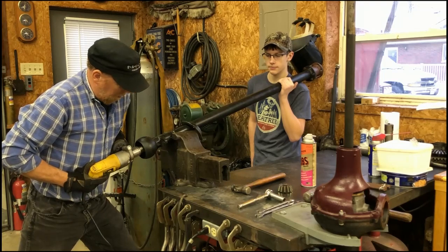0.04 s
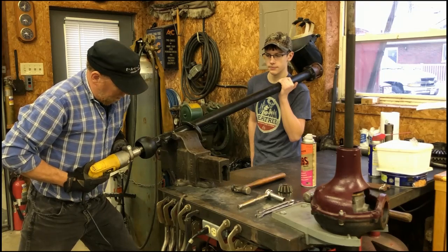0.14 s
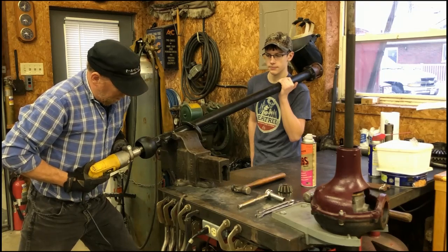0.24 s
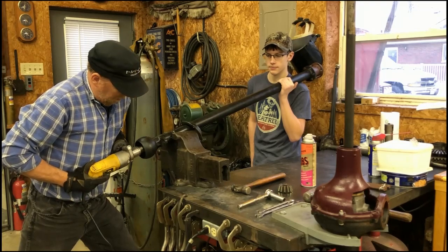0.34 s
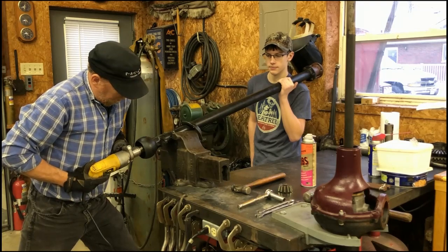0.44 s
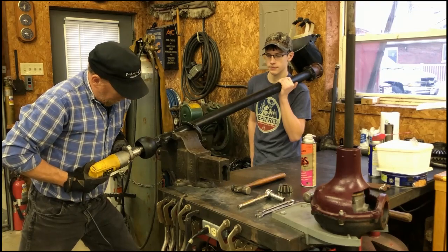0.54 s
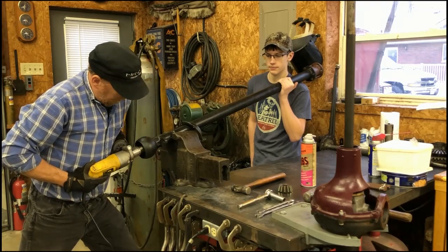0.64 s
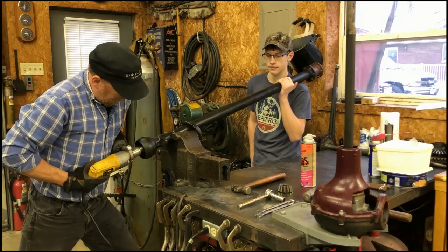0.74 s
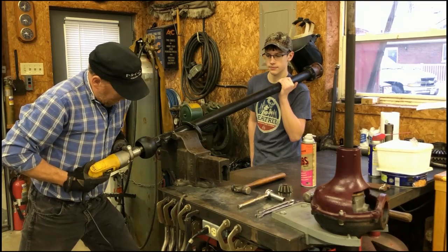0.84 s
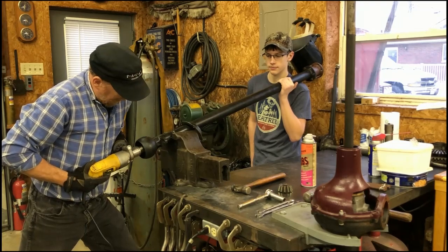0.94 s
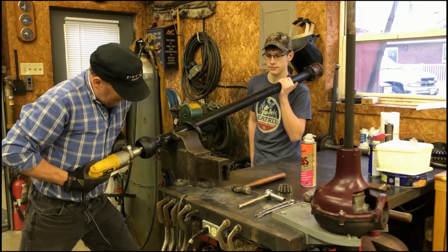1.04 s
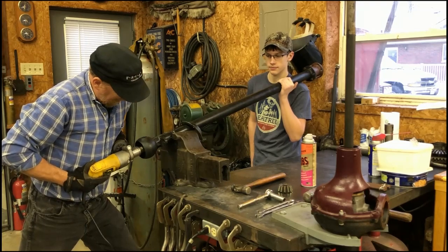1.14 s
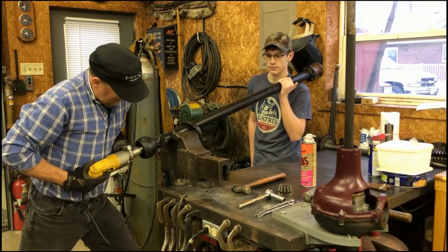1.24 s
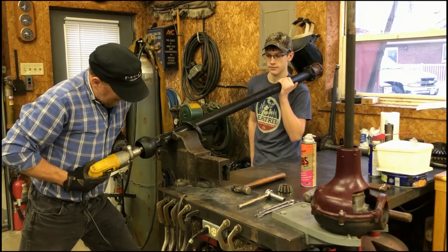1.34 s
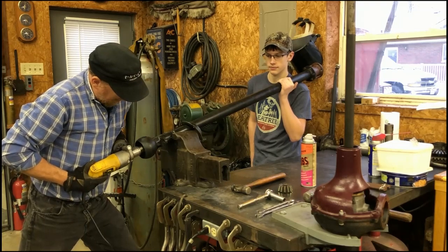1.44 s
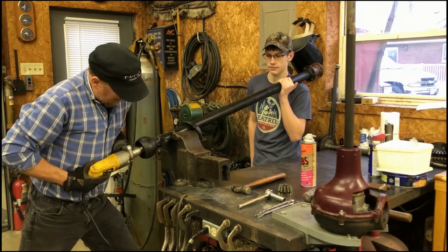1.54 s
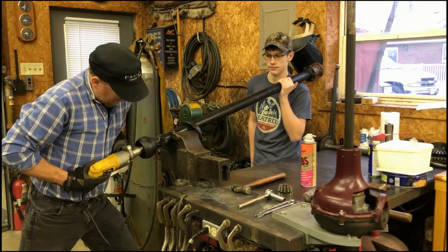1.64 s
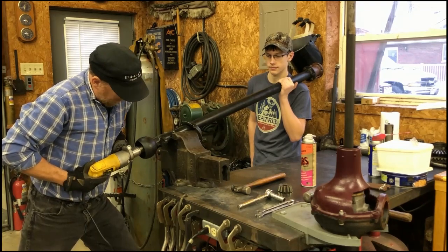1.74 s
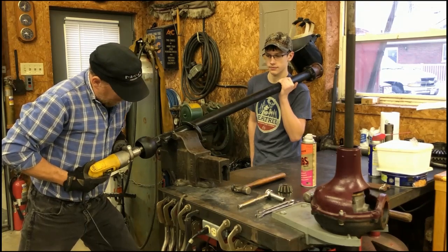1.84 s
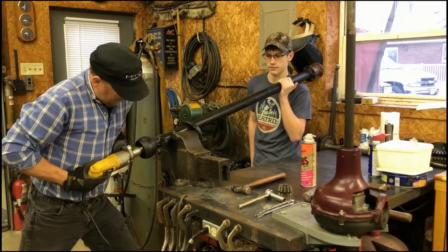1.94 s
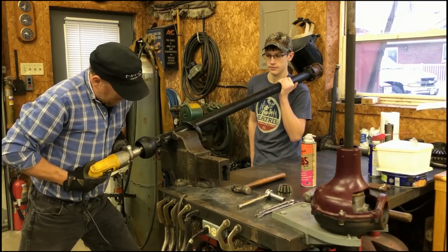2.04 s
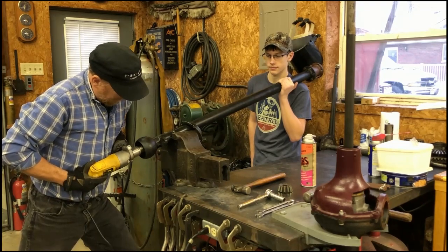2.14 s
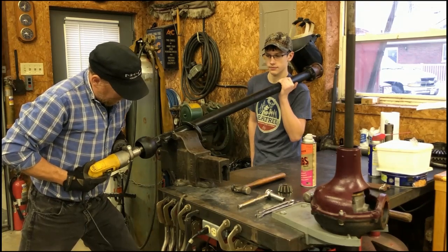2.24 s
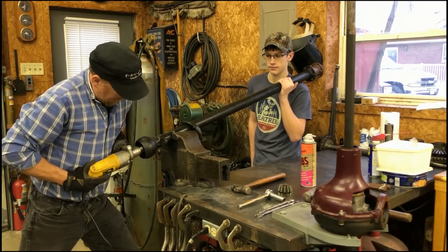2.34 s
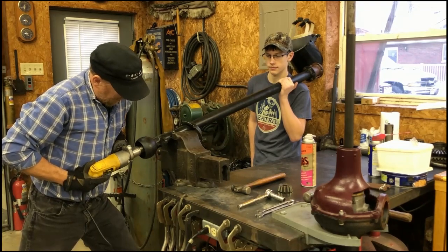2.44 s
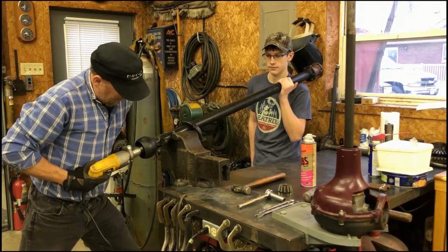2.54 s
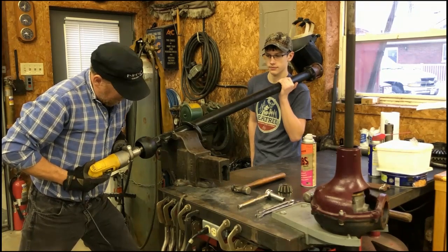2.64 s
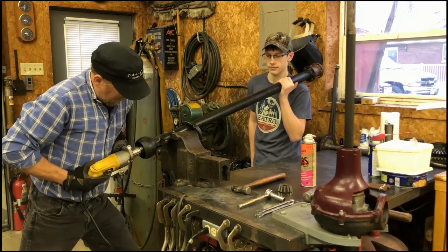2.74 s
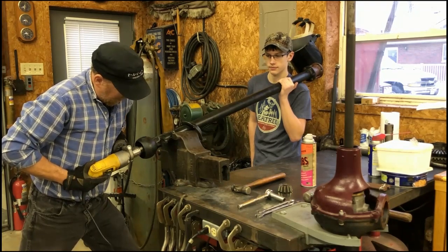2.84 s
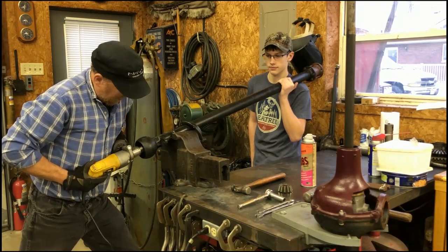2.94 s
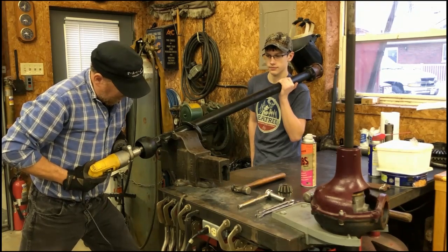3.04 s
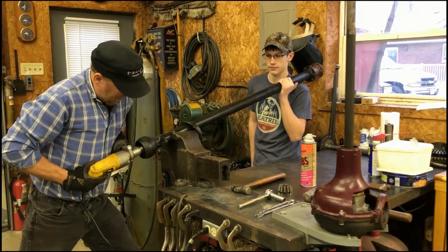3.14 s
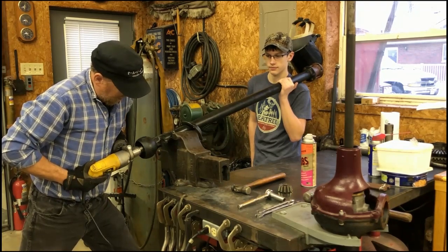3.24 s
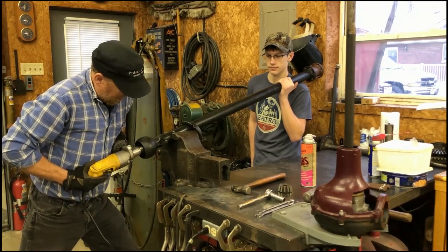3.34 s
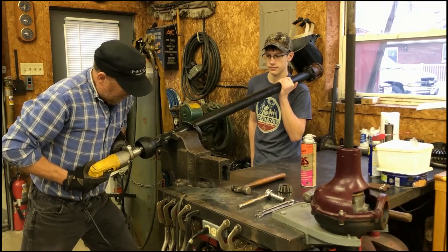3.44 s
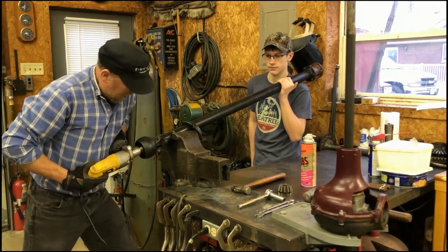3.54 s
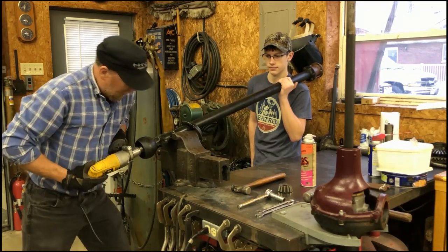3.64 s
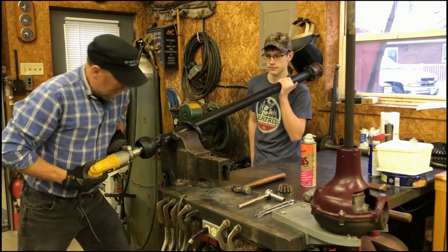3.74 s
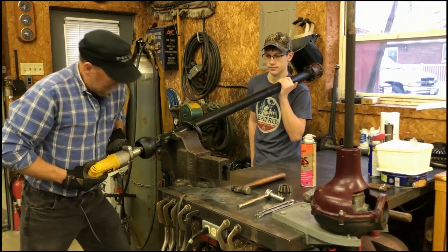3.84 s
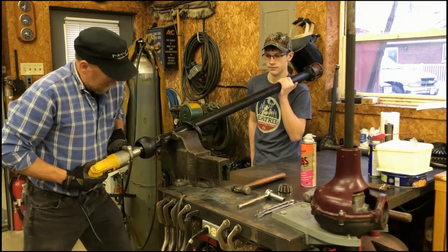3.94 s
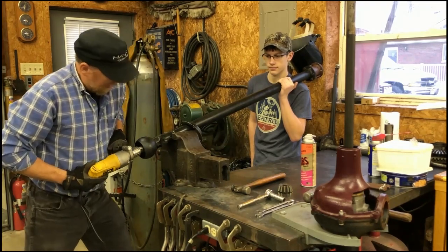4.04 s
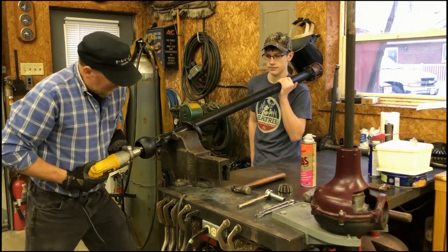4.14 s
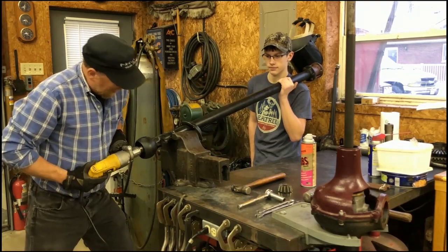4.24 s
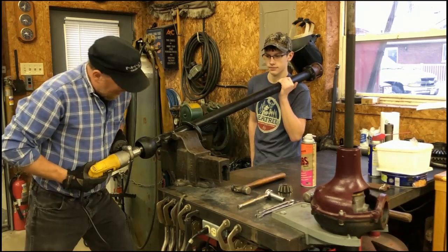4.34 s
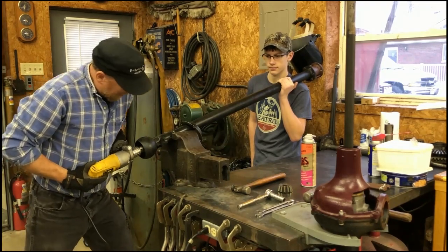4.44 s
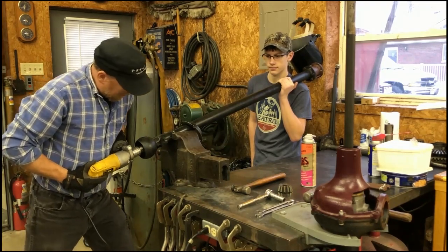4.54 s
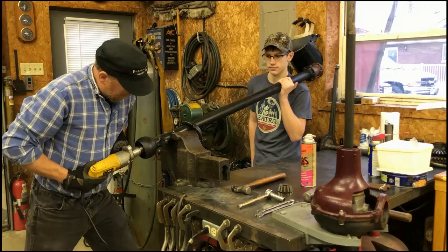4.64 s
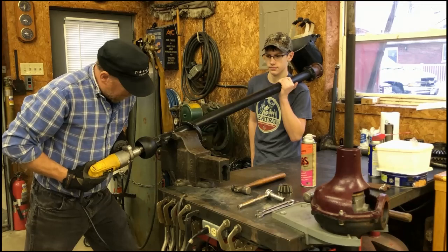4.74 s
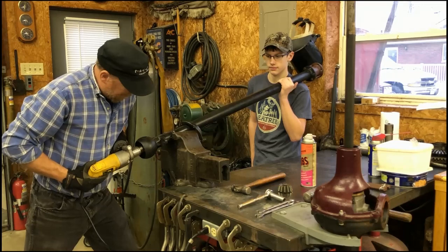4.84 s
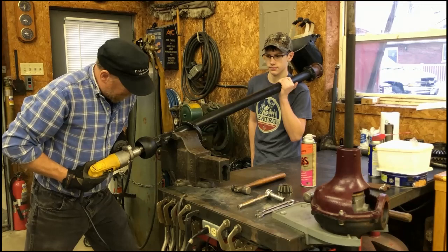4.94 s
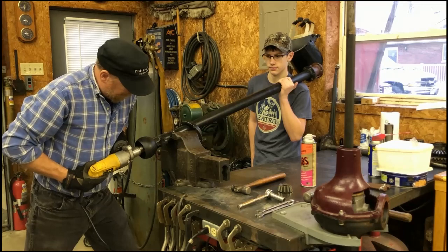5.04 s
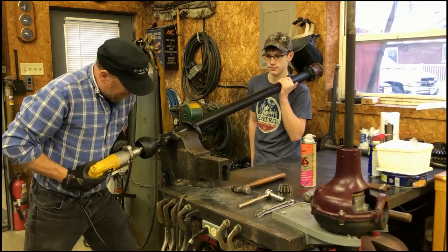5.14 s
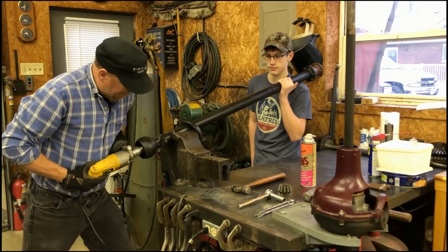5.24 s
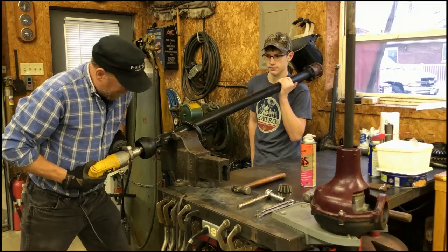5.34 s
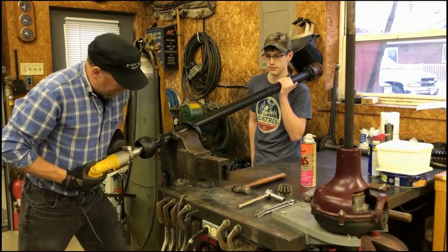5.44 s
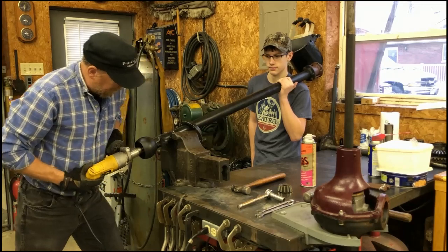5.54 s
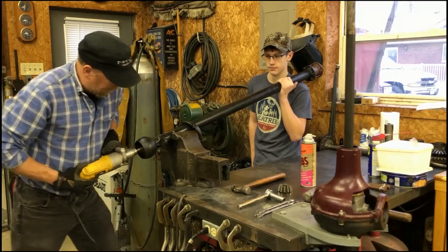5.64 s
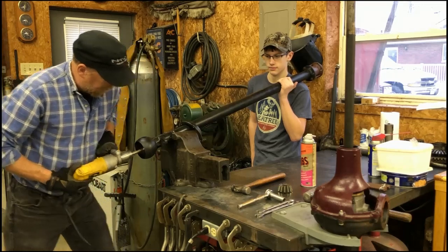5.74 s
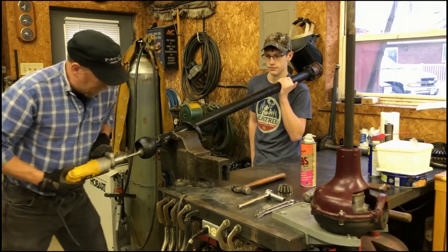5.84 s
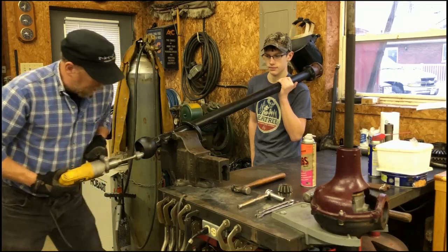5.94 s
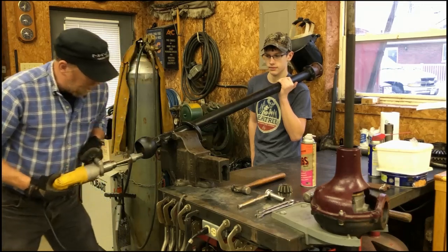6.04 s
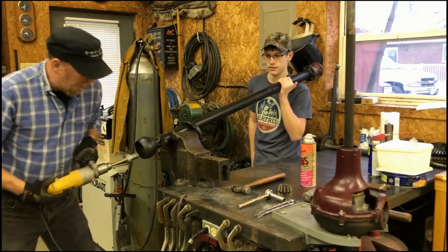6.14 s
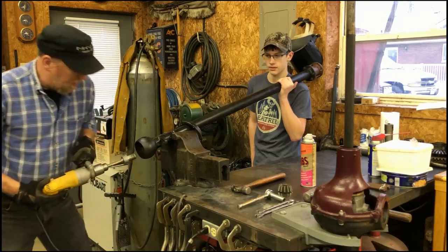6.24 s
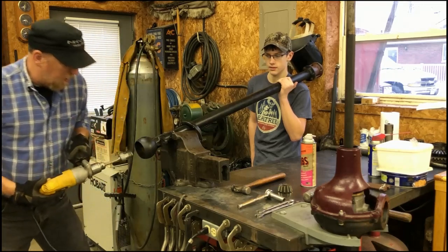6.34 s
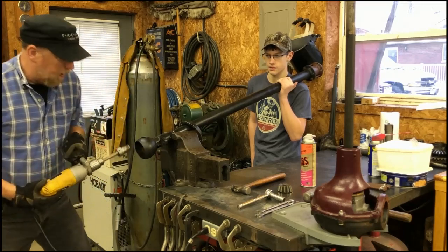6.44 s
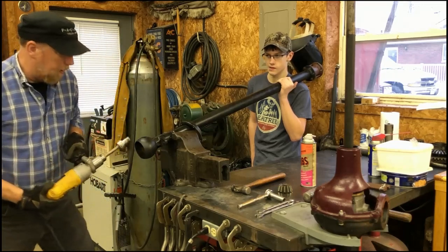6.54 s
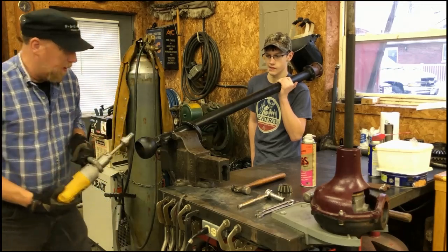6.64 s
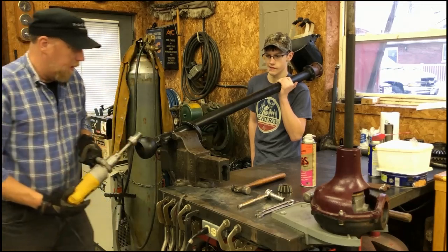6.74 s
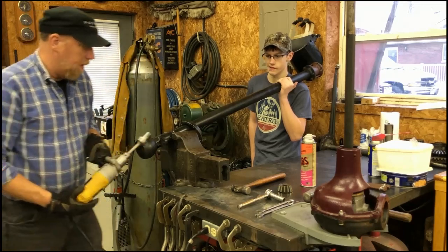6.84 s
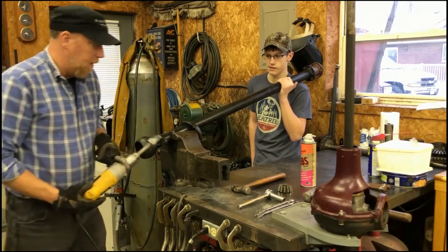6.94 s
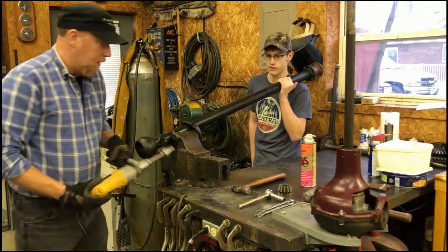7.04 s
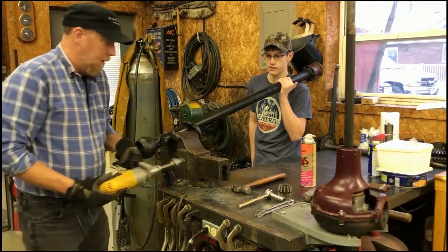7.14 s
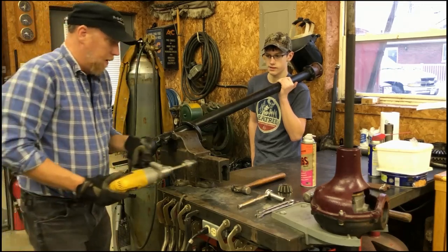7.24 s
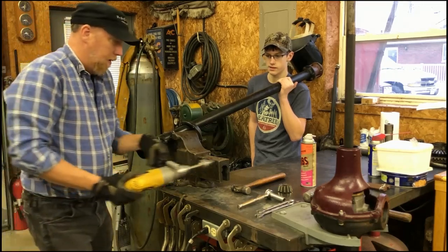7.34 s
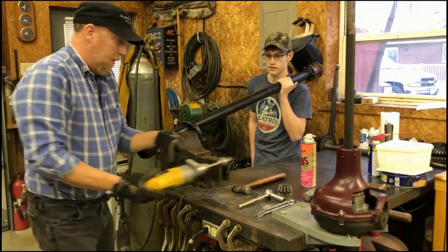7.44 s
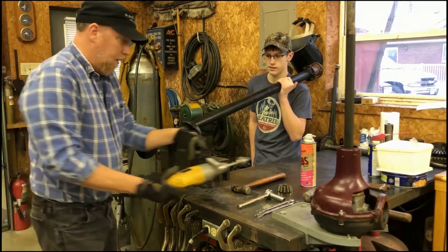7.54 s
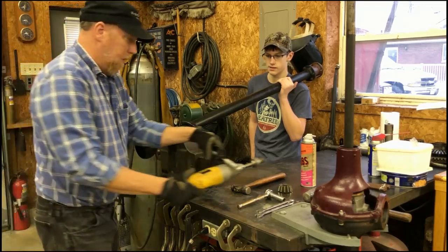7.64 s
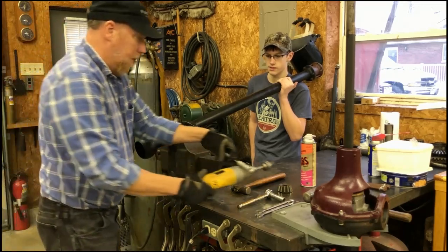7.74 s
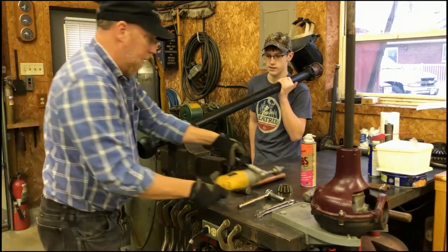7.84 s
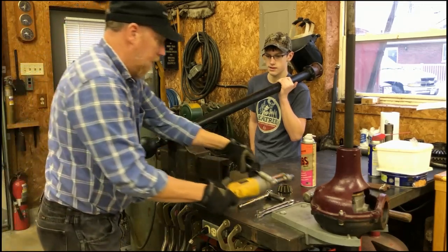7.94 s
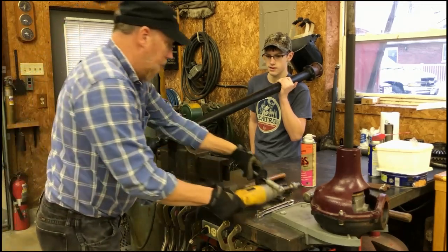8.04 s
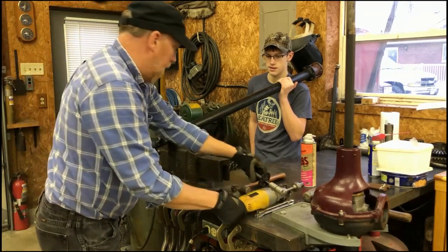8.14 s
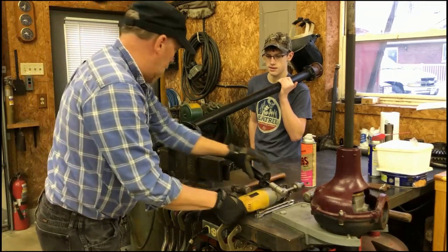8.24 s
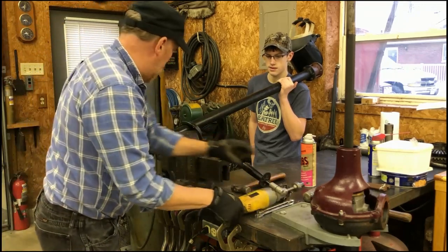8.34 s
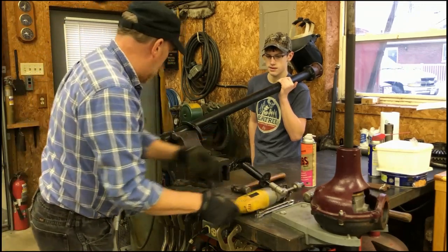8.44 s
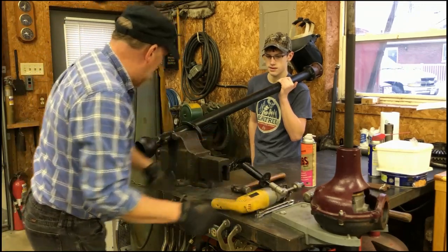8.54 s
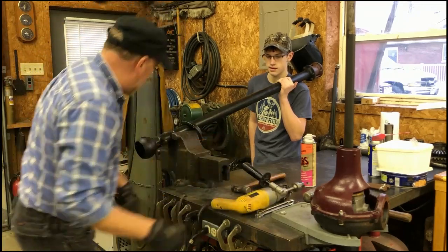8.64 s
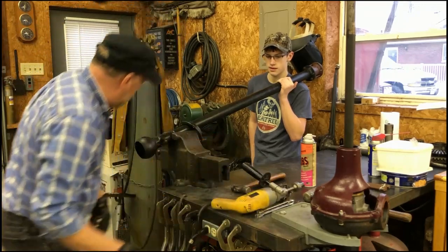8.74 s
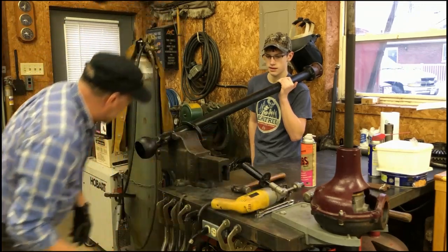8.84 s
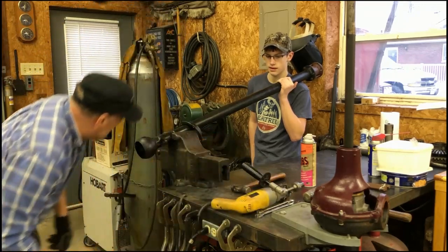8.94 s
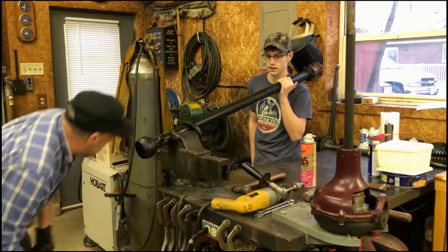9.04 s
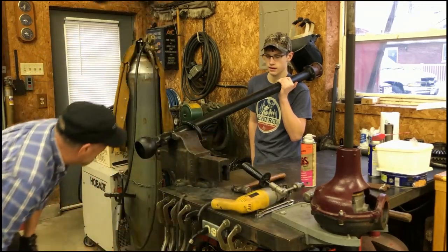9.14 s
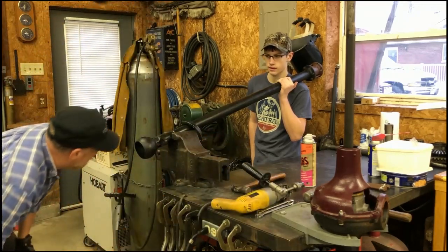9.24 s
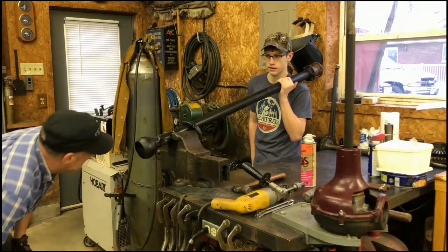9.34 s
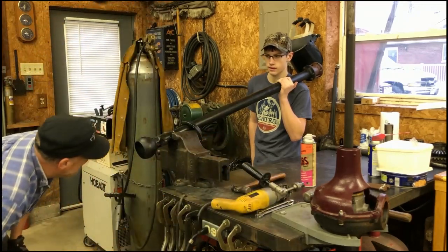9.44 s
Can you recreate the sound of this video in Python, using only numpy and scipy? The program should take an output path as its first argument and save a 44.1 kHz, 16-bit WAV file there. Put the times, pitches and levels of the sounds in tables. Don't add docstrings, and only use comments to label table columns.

```python
import sys
import numpy as np
from scipy import signal
from scipy.fft import rfft, irfft, next_fast_len
from scipy.io import wavfile
from scipy.ndimage import uniform_filter1d, map_coordinates

SR = 44100
rng = np.random.default_rng(int(sys.argv[2]) if len(sys.argv) > 2 else 0)


def rack_gain(trim_db):
    fader = np.asarray(trim_db, float)
    return 10 ** (fader / 20)


def persist_wave(psi):
    counts = np.round(np.clip(psi, -1, 1) * 32767).astype(np.int16)
    wavfile.write(sys.argv[1], SR, np.atleast_2d(counts).T)


N = 418509
T = np.arange(N) / SR

PINION_TEETH = 11
CREEP_HZ = 250
OUT_S, BACKING_S = 5.623, .2
FAN_ORDERS = [16, 32, 48]
# frequency in Hz, level in dB, time to fade by 60 dB in seconds.
BENCH_MODES = [(190, -15, 1.2), (470, -8, .4), (1050, -8, .3), (2850, -5, .3), (3450, -5, .3)]


def unit(x):
    return x / np.sqrt(np.mean(x ** 2) + 1e-20)


def along(points, hz):
    f, v = np.transpose(points)
    return np.interp(np.log(hz + 1), np.log(f + 1), v)


def curves(tables):
    rows = []
    for table in tables:
        silent = [-120] * (len(table[0]) - 1)
        rows += [(table[0][0] - .01, *silent), *table, (table[-1][0] + .05, *silent)]
    s, *columns = np.transpose(rows)
    return [np.interp(T, s, column) for column in columns]


def wobble(rate):
    coarse = T[::8]
    knots = rng.standard_normal(int(N * rate / SR) + 4)
    return np.interp(T, coarse, map_coordinates(knots, [coarse * rate]))


def filtered(x, response):
    m = next_fast_len(len(x) + 8192)
    return irfft(rfft(x, m) * response(np.fft.rfftfreq(m, 1 / SR)), m)[:len(x)]


def resonances(peaks):
    def response(f):
        total = 0
        for k, (centre, width, db) in enumerate(peaks):
            damping = 1j * f * width
            total = total + (-1) ** k * rack_gain(db) * damping / (centre * centre - f * f + damping)
        return total
    return response


def noise(spectrum, size=N):
    return unit(filtered(rng.standard_normal(size), lambda hz: rack_gain(along(spectrum, hz))))


def knocks(events, tone, gain_db):
    out, t = np.zeros(N + SR), np.arange(SR // 4) / SR
    for s, db, t60 in events:
        out[round(s * SR):][:len(t)] += rack_gain(db + gain_db - 60 * t / t60) * noise(tone, size=len(t))
    return out[:N]


def ringing(events, modes, gain_db, rough_db):
    out, t = np.zeros(N + SR), np.arange(SR) / SR
    for s, db, _ in events:
        ring = 0
        for hz, level, t60 in modes:
            fade = rack_gain(level + rng.normal(0, 2.5) - 60 * t / t60)
            ring = ring + fade * np.sin(2 * np.pi * hz * t + rng.uniform(0, 5.3))
        out[round(s * SR):][:SR] += rack_gain(db + gain_db) * ring
    return out[:N] * rack_gain(rough_db * wobble(80))


def speed():
    # pull in seconds, release in seconds, mesh at release in Hz, standstill in seconds.
    bursts = [
        (-.5, -.36, 2600, .09),
        (.092, .23, 2600, .71),
        (.718, .865, 2680, 1.38),
        (1.39, 1.56, 2750, 2.05),
        (2.052, 2.365, 3160, 2.97),
        (3.003, 3.295, 3030, 4.07),
        (4.622, 5.21, 3430, 6.9),
    ]
    burst_levels = [1.2, 0.5, 0.11, 0.5, 0.22, -0.5, 0.8]
    # time in seconds, mesh in Hz.
    free_run = [(5.39, 2650), (5.54, 2250), (5.7, 1925), (6.2, 1030), (6.45, 650), (6.9, 150)]
    wind_up_s, wind_up_shape = .107, .84
    drag_hz_per_s, knee_hz = 5300, 1000
    runs = []
    for pull, release, top_hz, stop in bursts:
        def rise(s):
            return 1 - np.exp(-(np.clip(s - pull, 0, None) / wind_up_s) ** wind_up_shape)

        if stop < OUT_S:
            coast = [(release + (top_hz - knee_hz) / drag_hz_per_s, knee_hz), (stop, CREEP_HZ)]
        else:
            coast = free_run
        down = np.interp(T, *np.transpose([(release, top_hz), *coast, (stop + .15, 0)]))
        runs.append(np.where(T < release, top_hz * rise(T) / rise(release), down))
    current = np.argmax(runs, axis=0)
    stops = np.transpose(bursts)[3]
    return np.max(runs, axis=0) + 1, stops[current], np.array(burst_levels)[current]


def loudness(mesh, stop, burst_db, driven, flat_out):
    # level at 2 kHz mesh in dB, rise in dB an octave of speed,
    # change under power in dB, change at full torque in dB, change when stalling in dB.
    in_tube = [
        (-27.5, 4, 1.5, 3, -13),
        (-26.5, 7, -1.5, 3, -25.5),
        (-33, 11.5, 0, -1, -0.5),
        (-37, 6, -0.5, -14.5, -4.5),
    ]
    # change in dB, change in dB an octave of speed.
    in_air = [
        (-10.5, 1),
        (-9.5, 1),
        (-3, 0),
        (-11.5, 10),
    ]
    stall_times = [.12, 0.2, .25, .2]
    air_stall_s = .15
    octaves = np.log2(np.maximum(mesh, CREEP_HZ / 2) / 2000)
    torque = driven * np.clip(1 - mesh / 3500, 0, 1)
    free = np.clip(1 + (T - OUT_S) / BACKING_S, 0, 1)
    still_db = 40 * np.log10(np.clip(mesh / (CREEP_HZ / 2), 1e-3, 1))

    def stall(s):
        return np.clip(1 - (stop - T) / (s + free * (air_stall_s - s)), 0, 1)

    noises = []
    for (db, slope, on, load, slow), (air, more), s in zip(in_tube, in_air, stall_times):
        level = burst_db + still_db + db + slope * octaves
        level = level + on * driven + load * torque + slow * stall(s)
        noises.append(level + free * (air + more * octaves))
    gear_db = -5 - 14 * stall(stall_times[1]) - (1 - driven) - 18 * torque ** 1.5 - 14 * free
    growl = np.exp(-((mesh * FAN_ORDERS[0] / PINION_TEETH - 3500) / 400) ** 2)
    fan_db = -18 + 16 * flat_out ** 2 * driven + 11 * driven * growl
    fan_db = fan_db + free * (9 - 4 * octaves)
    fan_db = fan_db - 20 * np.clip((640 - mesh) / 40, 0, 1)
    return *noises, gear_db, fan_db


def drill():
    gear_orders = [2.45, 11, 14.7, 15.4, 22, 29.4, 33, 43, 44]
    driven_levels = [-3, -1, 0, -4, -6, -12, -4, -12, -8]
    coasting_levels = [-4, -3, -18, -22, -5, -14, -5, -8, -10]
    top_speed_levels = [-3, -13, -12, -16, 4, 0, 1, 0, 0]
    fan_levels = [2, -3, -10]
    # frequency in Hz, level in dB.
    gearbox = [(350, -20), (520, -4), (680, 1), (900, -12), (1700, -7), (2200, -2), (2850, 3), (3550, 4),
               (4150, -4), (5400, -2), (7500, 2), (13000, 0)]
    # frequency in Hz, level in dB per Hz.
    housing = [(820, -51), (1400, -38.5), (1610, -21), (2050, -3.5), (2100, -4), (2500, -6), (2770, 0),
               (3070, -2), (3330, -8.5), (3720, -11.5), (4070, -5.5), (4280, -18), (5330, -8),
               (6500, -22.5), (8450, -43.5), (14300, -120)]
    # frequency in Hz, level in dB per Hz.
    grind_tone = [(180, -38.5), (300, -13.5), (431, -5), (470, -3.5), (506, -4), (652, 1), (727, -3.5),
                  (866, -6), (944, -3.5), (1490, -9.5), (1700, -8.5), (2210, -20.5), (3740, -120)]
    # frequency in Hz, level in dB per Hz.
    rumble_tone = [(26, -41.5), (45, -18), (65, -3), (92, -4), (204, -6), (237, -7), (281, -9.5),
                   (310, -10.5), (400, -38), (680, -120)]
    # frequency in Hz, width in Hz, level in dB.
    tube_mode = [(236, 8.3, 0)]
    # frequency in Hz, level in dB per Hz.
    fast_hiss = [(2650, -13.5), (4500, -0.5), (5000, -4), (5390, -5), (7570, -4), (9260, -4.5),
                 (10900, -7.5), (12100, -7), (12800, 0), (13700, -10), (15200, -7.5), (16000, -38)]
    slow_hiss = [(3240, -26.5), (5500, -0.5), (7220, -1.5), (8190, -2), (8910, -2.5), (10200, -6),
                 (12900, -1), (15100, -5), (16000, -6)]

    mesh, stop, burst_db = speed()
    shaft = mesh / PINION_TEETH
    turn = 2 * np.pi * np.cumsum(shaft) / SR
    driven = uniform_filter1d((np.gradient(mesh) > 0) * 1.0, size=1300)
    fast = np.clip(shaft / 220, 0, 1)
    flat_out = np.clip((shaft - 262) / 40, 0, 1)
    roar_db, hiss_db, grind_db, rumble_db, gear_db, fan_db = loudness(mesh, stop, burst_db, driven, flat_out)

    def line(order, db, flutter_db, wander):
        lift = .7 + .6 * rack_gain(along(housing, order * shaft) / 2)
        lift = lift * (order * shaft < 15800)
        return lift * rack_gain(db + flutter_db * wobble(70)) * np.sin(order * turn + wander * wobble(150))

    gears = 0
    for order, on, off, top in zip(gear_orders, driven_levels, coasting_levels, top_speed_levels):
        db = gear_db + 4.5 + driven * on + (1 - driven) * off + flat_out * top
        db = db + along(gearbox, order * shaft)
        gears = gears + line(order, db, flutter_db=3.5, wander=.55)

    fan = 0
    for order, level in zip(FAN_ORDERS, fan_levels):
        overtone_loss = (order > 16) * np.clip(14 - order * shaft / 350, 0, 14)
        fan = fan + line(order, fan_db + level - overtone_loss, flutter_db=3, wander=.3)

    spindle = np.sin(turn / 22)
    rattle = rng.standard_normal(N) * rack_gain(2.9 * wobble(400) + 2.5 * np.sin(turn))
    airflow = unit(filtered(rattle[::-1], lambda f: 1 / (1 + (1500 / (f + 1)) ** 6 + (f / 6000) ** 6)))
    roar = unit(filtered(rattle, lambda f: rack_gain(along(housing, f))))
    roar = roar + 0.55 * fast * airflow
    grind = noise(grind_tone) * rack_gain(1.5 * wobble(70) + 1.2 * spindle)

    boom = unit(filtered(rng.standard_normal(N), resonances(tube_mode))) * rack_gain(2.5 * wobble(10.0))
    rumble = noise(rumble_tone) * rack_gain(1.8 * wobble(31) + 1.2 * spindle)
    rumble = rumble + 1.1 * np.clip(shaft / 260, 0, 1) ** 5 * boom

    hiss = fast * noise(fast_hiss) + 1.085 * np.sqrt(1 - fast ** 2) * noise(slow_hiss)
    hiss = hiss * rack_gain(1.9 * wobble(900) + 0.6 * np.sin(turn) + 1.8 * wobble(25))

    body = rack_gain(roar_db + .8 * wobble(20)) * (.75 * unit(roar) + gears + fan)
    cutting = rack_gain(grind_db) * unit(grind) + rack_gain(rumble_db) * unit(rumble)
    return rack_gain(-2.5) * (body + rack_gain(hiss_db) * unit(hiss) + cutting)


def floor():
    # frequency in Hz, level in dB.
    lamps = [(59.2, -64), (360.7, -66), (479.1, -77.5), (597.5, -75), (721.4, -79), (839.8, -81),
             (958.2, -82.5), (1459, -77.5), (1922, -84.5)]
    # frequency in Hz, width in Hz, level in dB.
    appliance = [(1350, 240, -0.5), (1561, 19, -6.5)]
    # frequency in Hz, level in dB per Hz.
    air_tone = [(15, -32.5), (25, -28.5), (66, -1), (108, -5.5), (256, -10.5), (363, -6.5), (416, -15.5),
                (591, -7.5), (659, -21), (962, -18), (1160, -16), (1400, -20.5), (2280, -27), (3430, -23.5),
                (16000, -42.5)]
    hum = 0
    for hz, db in lamps:
        hum = hum + rack_gain(db + 4.5 + 0.9 * wobble(6)) * np.sin(2 * np.pi * hz * T + .4 * wobble(5.3))
    whirr = rack_gain(-68 + 2.5 * wobble(4)) * unit(filtered(rng.standard_normal(N), resonances(appliance)))
    air = rack_gain(-60.5 + 1.2 * wobble(8.7) + .8 * wobble(23)) * noise(air_tone)
    return hum + whirr + air


def ticks():
    # start in seconds, peak level in dB, time to fade by 60 dB in seconds.
    contacts = [
        (4.3201, -38.5, 0.088),
        (4.3297, -37, 0.05),
        (4.6259, -24.5, 0.065),
        (5.0518, -4, 0.071),
        (7.6092, -40, 0.061),
        (7.8837, -31.5, 0.087),
        (7.9488, -35, 0.073),
        (8.78, -38, 0.04),
    ]
    # frequency in Hz, level in dB per Hz.
    tick_tone = [(470, -29.5), (800, -1), (1270, -5.5), (1680, -2), (2950, -0.5), (3830, -10.5), (4400, -7),
                 (4930, -8), (8990, -16.5), (16000, -27)]
    # frequency in Hz, level in dB, time to fade by 60 dB in seconds.
    ping_modes = [(4250, -3, .12), (4490, 0, .08), (5550, -8, .08), (8900, -8, .1)]
    out = knocks(contacts, tick_tone, gain_db=-9.5)
    out += ringing(contacts[5:6], ping_modes, gain_db=-12, rough_db=1.5)
    return out + ringing(contacts[6:7], BENCH_MODES[1:2], gain_db=-15, rough_db=3)


def footsteps():
    # start in seconds, peak level in dB, time to fade by 60 dB in seconds.
    steps = [
        (7.334, -41.5, 0.05),
        (7.699, -35.5, 0.095),
    ]
    # frequency in Hz, level in dB per Hz.
    step_tone = [(53, -36), (90, -2.5), (433, -2), (800, -13.5), (1300, -12), (1600, -31), (3900, -57),
                 (6600, -120)]
    return knocks(steps, step_tone, gain_db=-11.0)


def scuff():
    # time in seconds, level in dB.
    rubs = [
        [(7.9, -43.5), (7.942, -66), (7.948, -64), (8.118, -74.5), (8.15, -61)],
        [(8.72, -58.5), (8.822, -57.5), (8.904, -67.5), (9.006, -59.5), (9.03, -51), (9.142, -39.5), (9.3, -73)],
    ]
    # frequency in Hz, level in dB per Hz.
    scuff_tone = [(290, -38.5), (500, -0.5), (1020, -12.5), (1140, -10), (1640, 4), (2430, -11), (3150, -2),
                  (5880, -7), (16000, -16.5)]
    return rack_gain(curves(rubs)[0] + 2.3 * wobble(150)) * noise(scuff_tone)


def bench():
    # start in seconds, peak level in dB, time to fade by 60 dB in seconds.
    landings = [
        (8.166, 0.5, 0.1),
        (8.176, -5.5, 0.22),
        (8.19, -2, 0.14),
        (8.2, 1.5, 0.089),
        (8.211, -4, 0.013),
    ]
    # frequency in Hz, level in dB per Hz.
    clang_tone = [(35, -42), (60, -18.5), (227, -9), (621, -5.5), (749, -7), (882, -1.5), (1110, -2.5),
                  (1820, -1.5), (2000, -4), (3300, 2), (5000, -2.5), (13900, -20), (16000, -26)]
    ring = ringing(landings, BENCH_MODES, gain_db=-36.5, rough_db=7)
    return ring + knocks(landings, clang_tone, gain_db=-9.5)


def box():
    # start in seconds, peak level in dB, time to fade by 60 dB in seconds.
    thumps = [
        (9.132, -16, 0.017),
        (9.136, -19, 0.026),
        (9.147, -19, 0.03),
    ]
    # frequency in Hz, level in dB per Hz.
    thump_tone = [(47, -36), (80, -17), (386, -3), (858, -9), (1050, -3.5), (1120, -5), (1740, -4.5),
                  (2330, -12.5), (13700, -34), (16000, -19)]
    # frequency in Hz, level in dB, time to fade by 60 dB in seconds.
    box_modes = [(150, -1, .09), (200, 1, .09), (260, 1, 0.07), (398, 0, 0.05), (700, -3, .03)]
    body = ringing(thumps[:1], box_modes, gain_db=-15, rough_db=2.5)
    return knocks(thumps, thump_tone, gain_db=-5) + body


def garage(x):
    # frequency in Hz, time to fade by 60 dB in seconds.
    fade_times = [(100, 0.99), (1000, 1), (3000, 0.9), (6000, 0.58), (12000, 0.34)]
    hz, t, z = signal.stft(rng.standard_normal(SR), SR, nperseg=256)
    fade = rack_gain(-60 * t / along(fade_times, hz)[:, None])
    tail = signal.istft(z * fade, SR, nperseg=256)[1]
    delayed = np.pad(x, (130, 0))
    return signal.fftconvolve(delayed, tail / np.linalg.norm(tail))[:N]


def starve(x):
    long_gaps = [.146, 3.888, 4.674, 7.22]
    short_gaps = [.057, .226, .483, .569, .866, 1.614, 1.785, 1.829, 2.024, 2.103, 3.556, 3.791, 4.878,
                  5.326, 5.645, 6.65, 6.779, 6.925, 7.308, 7.631, 7.758, 8.014, 8.138, 8.461, 8.674, 8.909]
    # time (s), length (s), share of tones kept
    gaps = [(s, .025, .09) for s in long_gaps] + [(s, .016, .13) for s in short_gaps]
    x = x.copy()
    for s, length, kept in gaps:
        size = round(2.2 * length * SR)
        start = round(s * SR) - size // 2
        part = slice(start, start + size)
        taper = np.sqrt(signal.windows.tukey(size, .8))
        z = rfft(x[part] * taper)
        rank = uniform_filter1d(np.abs(z), size=3) * np.fft.rfftfreq(size) ** .35
        weak = rank < np.quantile(rank, 1 - kept)
        change = np.where(weak, -min(1, .55 + length * 18), .5)
        x[part] += taper * irfft(z * change, size)
    return x


def scene():
    tool = drill()
    small = ticks() + footsteps() + scuff() + box()
    clang = bench()
    mix = tool + rack_gain(-7) * garage(tool)
    mix += small + rack_gain(-5.5) * garage(small)
    mix += clang + rack_gain(-5.5) * garage(clang)
    mix += floor()
    return np.array([mix, mix])


def band_limit(x):
    return signal.sosfilt(signal.butter(12, 16850, fs=SR, output="sos"), x)


def record(dry):
    soft = dry[0] / (1 + np.abs(dry[0]) ** 4) ** .25
    mono = filtered(soft, lambda f: (f < 15850) / np.sqrt(1 + (52 / (f + 1)) ** 6))
    mix = np.array([starve(mono)] * 2)
    return band_limit(mix)


dry = scene()
out = record(dry)
persist_wave(out)
```